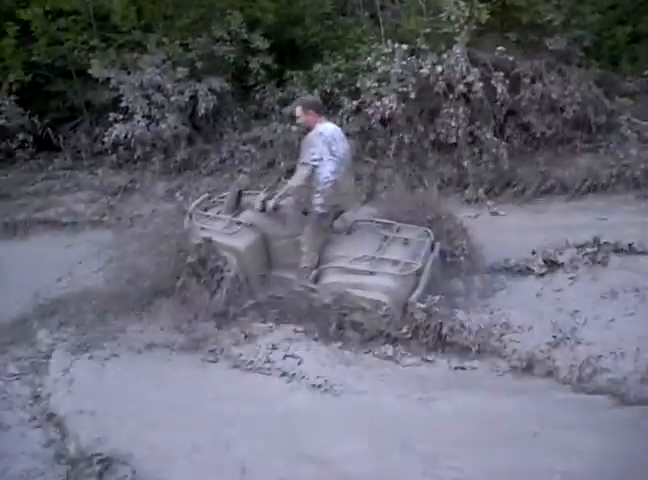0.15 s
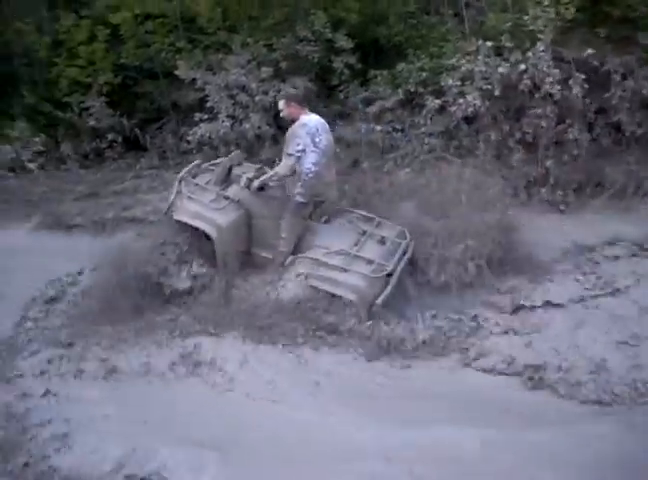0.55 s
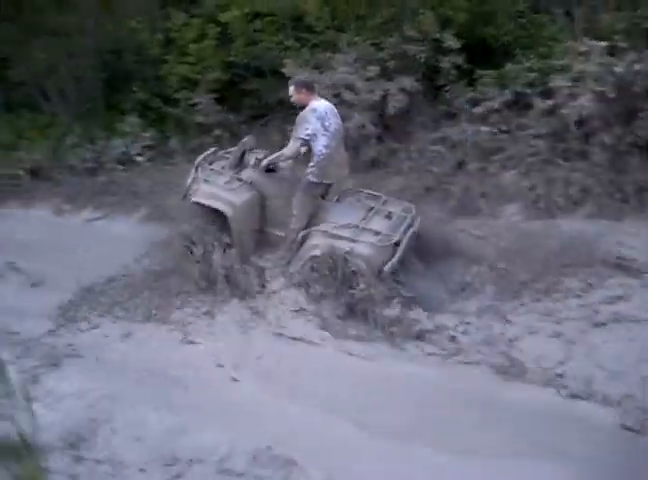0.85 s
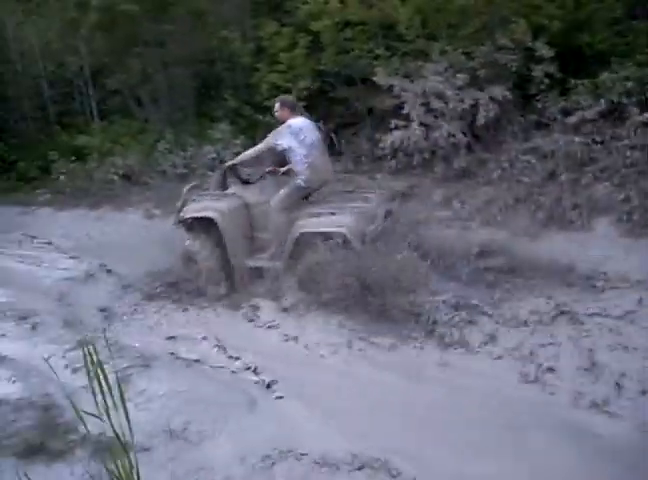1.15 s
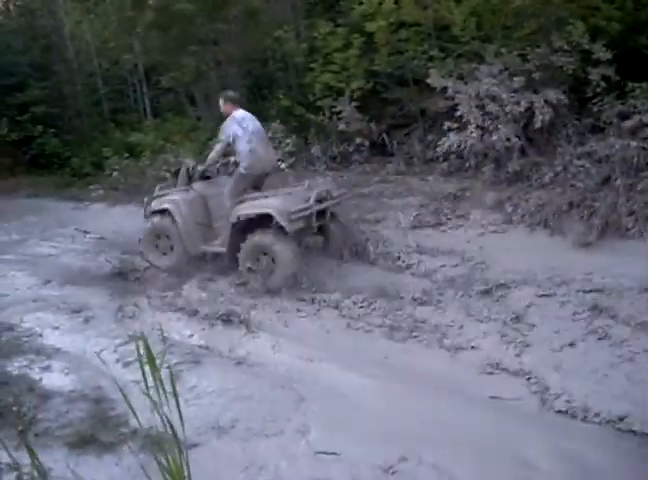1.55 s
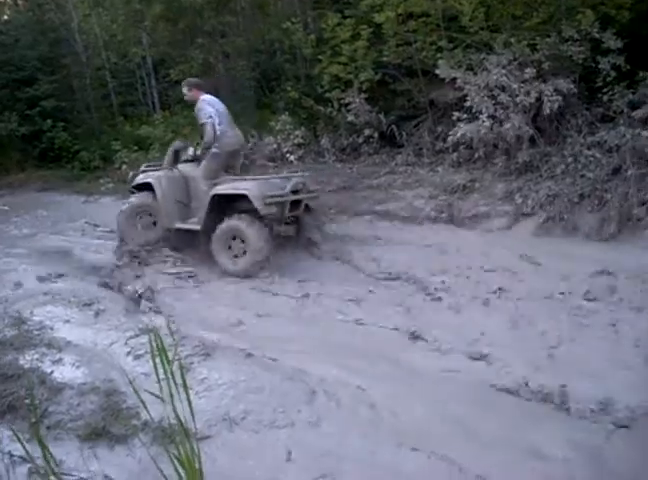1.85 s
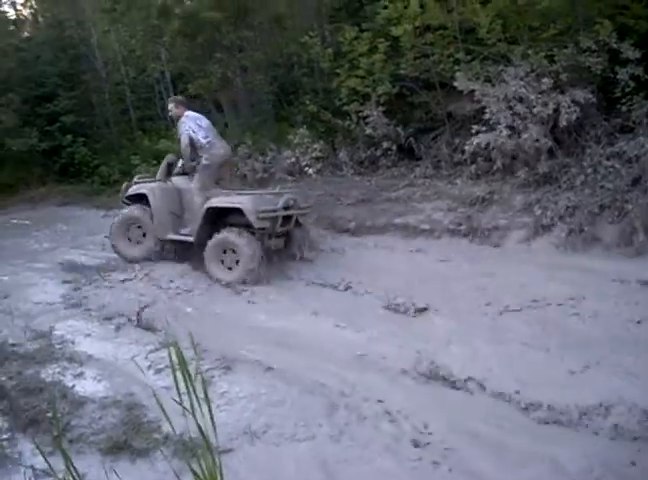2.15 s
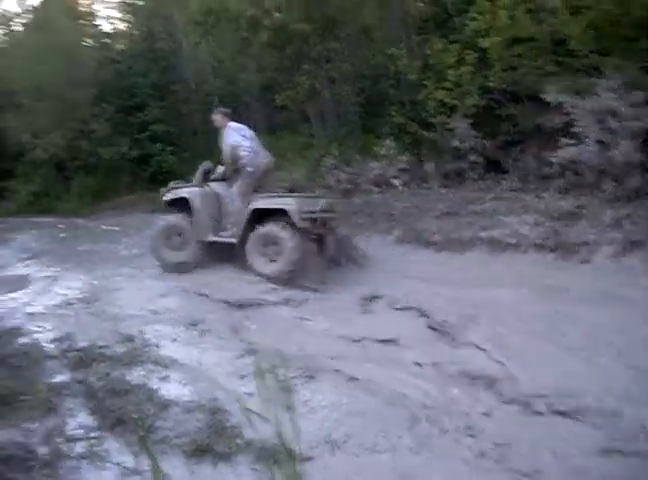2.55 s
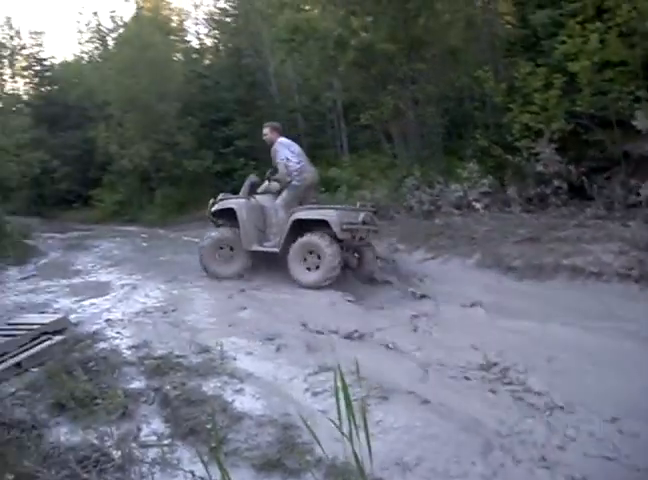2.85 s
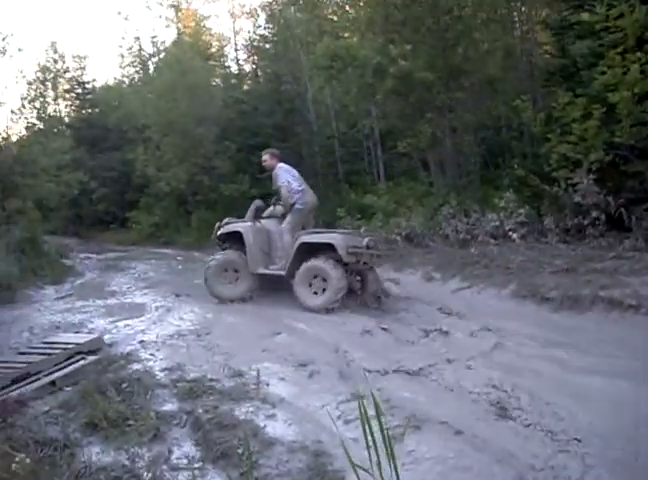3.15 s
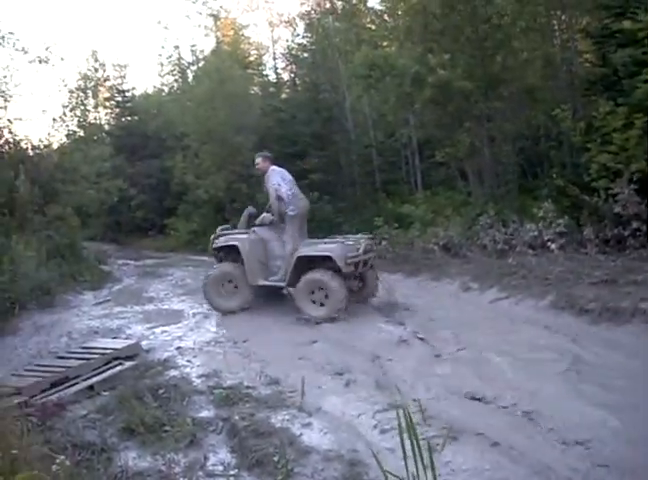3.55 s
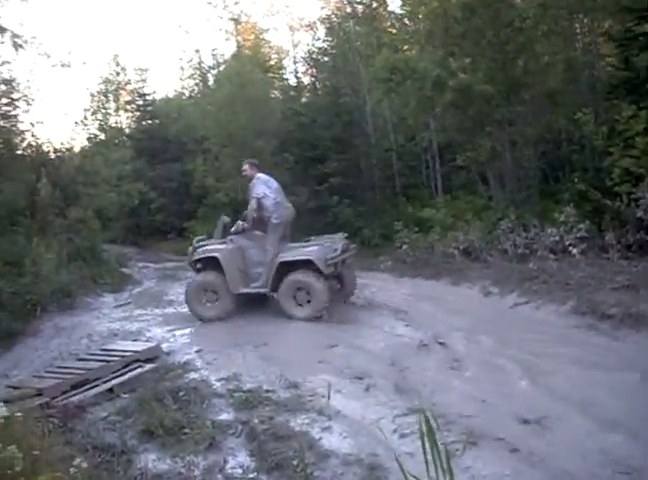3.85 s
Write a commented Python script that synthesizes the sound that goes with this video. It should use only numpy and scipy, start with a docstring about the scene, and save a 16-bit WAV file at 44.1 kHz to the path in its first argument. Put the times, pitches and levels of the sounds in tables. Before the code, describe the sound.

For the first 0.9 seconds a quad bike engine roars at full throttle, its drowned exhaust blasting loud, gritty, buzzing spray over gurgling, churning mud, dipping slightly near 0.5. The spray cuts off and the engine falls by 1.3 to a low, quiet chug amid settling water. From 2 it revs gently, peaking near 2.3, eases by 2.9, then revs again around 3.3-3.7, with small gritty tyre slaps. Dry outdoor sound, dull at the very top.

```python
"""A single-cylinder engine guns a quad bike out of a mud hole, its tail under water.
Its note is a stack of engine orders, coloured by a drowned pipe, an open pipe and a booming silencer.
Each firing blasts a burst of noisy, ringing spray; gurgle and muddy churn are coloured noise, with drops.
The throttle shuts and the water settles; the engine chugs up the bank in two gentle revs
while the tyre lugs slap the wet mud in short bursts of gritty noise."""
import sys
import numpy as np
from scipy import signal
from scipy.fft import rfft, irfft
from scipy.io import wavfile

SR = 44100
rng = np.random.default_rng(int(sys.argv[2]) if len(sys.argv) > 2 else 0)


def store_pcm(level_fs):
    """Save levels as 16-bit WAV."""
    pcm = np.round(np.clip(level_fs, -1, 1) * 32767).astype(np.int16)
    wavfile.write(sys.argv[1], SR, np.atleast_2d(pcm).T)


N = 176400
TIME = np.arange(N) / SR   # s

# engine speed: (time [s], firing rate [Hz])
FIRING_RATE = [(0, 49.8), (.15, 48.37), (.42, 45.4), (.6, 46.96), (.84, 49.2), (1.0, 39), (1.15, 29),
               (1.35, 23), (1.88, 21), (2.0, 23.3), (2.24, 31.6), (2.35, 32.1), (2.58, 30.5), (2.85, 22.3),
               (3.1, 22.8), (3.24, 24), (3.42, 27.4), (3.7, 30.6), (4.0, 25.5)]
# exhaust note with the pipe under water: (time [s], level [dB])
DROWNED_LEVEL = [(0, -30.5), (.22, -35.5), (.37, -29.5), (.5, -31.5), (.55, -35.5), (.8, -35.5), (.95, -36),
                 (1.02, -50), (1.2, -64)]
# exhaust note in open air, swelling with the throttle: (time [s], level [dB])
OPEN_LEVEL = [(.5, -51), (.56, -37), (.8, -40.5), (.9, -51), (1.25, -50.5), (1.82, -54), (1.98, -40),
              (2.25, -34.5), (2.55, -39.5), (2.75, -44.5), (2.95, -49.5), (3.17, -43.5), (3.32, -36.5),
              (3.45, -38.5), (3.7, -38), (3.85, -48.5)]
# low boom of the silencer: (time [s], level [dB])
BOOM_LEVEL = [(.85, -61), (1.08, -38), (1.3, -47), (1.7, -51.5), (2.05, -47), (2.3, -44.5), (2.7, -45.5),
              (2.95, -49.5), (3.3, -45), (4, -48)]
# colour of the drowned pipe: (frequency [Hz], relative level [dB])
DROWNED_COLOUR = [(46, -36), (95, -7), (142, -6), (185, -1.5), (232, -14.5), (274, -0.5), (325, -16.5),
                  (480, -18.5), (680, -10.5), (1400, -28)]
# colour of the open pipe, with a reedy bark above the note: (frequency [Hz], relative level [dB])
OPEN_COLOUR = [(135, -24), (195, -7.5), (222, 0.5), (240, 0.5), (262, -3.5), (292, -11.5), (345, -24),
               (650, -31), (850, -17), (965, -10.5), (1200, -27)]
# colour of the silencer boom: (frequency [Hz], relative level [dB])
BOOM_COLOUR = [(30, -24), (65, -16), (92, -4.5), (112, 2), (126, -2), (155, -14), (200, -13)]
# colour of the gas rushing out with every firing: (frequency [Hz], relative level [dB])
RASP_COLOUR = [(300, -24), (600, -20), (800, 0), (950, 13), (1300, -10), (2500, -3), (11000, -13)]
# spray blown up by the exhaust: (time [s], level [dB])
SPRAY_LEVEL = [(0, -22.5), (.16, -19.5), (.26, -23.5), (.38, -23.5), (.49, -27.5), (.56, -20), (.7, -18),
               (.84, -18), (.865, -21.5), (.9, -34), (1.0, -78)]
# colour of the spray: (frequency [Hz], relative level [dB])
SPRAY_COLOUR = [(150, -33), (500, -11), (1200, -8.5), (1600, 0.5), (2100, -1), (2700, 0), (5500, -0.5),
                (8000, -3), (10300, -6.5), (12000, -17.5)]
# resonances that ring in the spray: (frequency [Hz], width [Hz], relative level [dB])
JET_MODES = [(2620, 290, 2.5), (3500, 100, 7), (3460, 81, 8.5), (4370, 220, -1), (4930, 170, -1.5),
             (5900, 170, -0.5), (6880, 280, -4.5)]
# water gurgling round the pipe: (time [s], level [dB])
GURGLE_LEVEL = [(0, -33.5), (.27, -28.5), (.5, -30), (.82, -29), (.9, -36.5), (1.45, -40), (2.2, -52)]
# colour of the gurgle: (frequency [Hz], relative level [dB])
GURGLE_COLOUR = [(25, -24), (90, -10.5), (250, -6.5), (450, -13.5), (560, -5.5), (680, 2.5), (800, -4.5),
                 (980, -5), (1250, -15), (3000, -21)]
# mud and water thrown by the wheels: (time [s], level [dB])
CHURN_LEVEL = [(0, -30.5), (.9, -29.5), (1.3, -30.5), (1.55, -32), (1.8, -35), (2.2, -32.5), (2.6, -35),
               (3.0, -38.5), (3.5, -37.5), (3.85, -40.5), (4, -40.5)]
# colour of the churned water: (frequency [Hz], relative level [dB])
CHURN_COLOUR = [(25, -31), (70, -2.5), (420, -5.5), (600, -5), (800, 1.5), (1150, 0), (2700, -3),
                (5000, -8), (10200, -15), (12000, -48)]
# slaps of the tyre lugs on the mud: (time [s], relative level [dB])
SLAPS = [(1.9627, -18.5), (1.9984, -19), (2.0388, -25), (2.0934, -20), (2.1294, -17), (2.165, -16.5),
         (2.207, -24), (2.2694, -17.5), (2.3555, -23), (2.6863, -32), (2.7911, -35), (2.8454, -28),
         (2.9542, -30), (3.0074, -28), (3.1073, -25.5), (3.1941, -27), (3.2705, -26), (3.3084, -27),
         (3.3483, -26), (3.423, -23.5), (3.4585, -27), (3.5284, -24), (3.6301, -22.5), (3.731, -25.5),
         (3.8337, -34), (3.953, -24)]
# colour of a slap: (frequency [Hz], relative level [dB])
SLAP_COLOUR = [(200, -5), (700, -24.5), (1500, -4.5), (2700, 4.5), (5000, -0.5), (10200, -4), (12000, -33)]

# cycle position at the start, and where the exhaust valve opens (cycles)
START_TURN, FIRE_TURN = 0.84, 0.35
# unevenness of each engine order (share), and its rate
ORDER_WAVER, BOOM_WAVER, WAVER_HZ = 0.3, 0.47, 16
# how each firing is smeared over its cycle: near 0 it thumps, near 1/3 it purrs
DROWNED_SMEAR, OPEN_SMEAR, BOOM_SMEAR = 0.3, 0.38, 0.0305
# the open pipe's resonances rise a little with speed, up to a top firing rate: top firing rate, exponent
LIFT_TOP_HZ, PIPE_RISE = 31.6, 0.27
RASP_DB, RASP_DECAY_TURNS = -7, 0.33
# spray burst: rise, fall and open part (cycles)
BURST_ATTACK, BURST_RELEASE, BURST_SHARE = 0.074, 0.19, 0.81
# spray: level in the gaps, spread of the grit, level of the ringing
BURST_GAP_DB, SPRAY_GRAIN_DB, JET_RING_DB = -3.5, 2, -7.5
# churn: flicker of the wash, then the drops' density, ring length, spread of sizes and level
CHURN_FLICKER_DB = 1.0
DROPS_PER_S, DROP_CYCLES, DROP_SPREAD_DB, DROPS_DB = 1500, 4.7, 3, -5.5
# how a splat rises, holds, dies and crackles, and the level of all slaps
SLAP_ATTACK_S, SLAP_HOLD_S, SLAP_DECAY_S, SLAP_GRAIN_DB = 0.00074, 0.0096, 0.0045, 3
SLAP_DB = -14
CUTOFF_HZ = 12400


def from_db(db):
    """Decibels to gain."""
    return 10 ** (np.asarray(db) / 20)


def rms_one(x):
    """Scale to rms 1."""
    return x / np.sqrt(np.mean(x ** 2) + 1e-20)


def curve(rows):
    """Join (time, value) rows by straight lines."""
    return np.interp(TIME, *np.transpose(rows))


def gain_at(spectrum, hz):
    """Gain of a colour at some frequencies, joined on a log frequency axis."""
    points, db = np.transpose(spectrum)
    return from_db(np.interp(np.log(hz + 1), np.log(points), db))


def noise(spectrum):
    """Coloured noise of rms 1."""
    white = rfft(rng.standard_normal(N))
    return rms_one(irfft(white * gain_at(spectrum, np.fft.rfftfreq(N, 1 / SR)), N))


def drift(rate):
    """Smooth random wander of spread 1; rate in Hz."""
    r = np.exp(-2 * np.pi * rate / SR)
    wander = signal.lfilter([1], [1, -2 * r, r * r], rng.standard_normal(N + SR))
    return rms_one(wander[SR:])   # the first second lets the filter settle


def resonance(x, hz, width):
    """One resonance with gain 1 on top."""
    r = np.exp(-np.pi * width / SR)
    zeros = np.array([1, 0, -1]) * (1 - r * r) / 2
    poles = [1, -2 * r * np.cos(2 * np.pi * hz / SR), r * r]
    return signal.lfilter(zeros, poles, x + 1e-18)


def body(x, modes):
    """Resonances in parallel with alternating signs; rms 1."""
    ringing = 0
    for k, (hz, width, db) in enumerate(modes):
        ringing = ringing + (-1) ** k * from_db(db) * resonance(x, hz, width)
    return rms_one(ringing)


def engine_orders(turns, speed, spectrum, waver, smear, count):
    """Multiples of the firing rate glide through the pipe's colour, each wavering a little; rms about 1."""
    coarse = TIME[::100]
    knots = np.arange(0, TIME[-1] + 1, 1 / WAVER_HZ)
    out, power = 0, 0
    for k in range(1, count + 1):
        gain = gain_at(spectrum, k * speed[::100])
        wobble = 1 + waver * np.interp(coarse, knots, rng.standard_normal(len(knots)))
        # phase growing with the square of the order spreads the pulse over its cycle
        order = np.sin(2 * np.pi * (k * turns - smear * k * k))
        out = out + np.interp(TIME, coarse, gain * wobble) * order
        power = power + gain ** 2 / 2
    return out / np.interp(TIME, coarse, np.sqrt(power))


def drowned_exhaust(turns, speed):
    """The engine orders, coloured by the pipe under water."""
    note = engine_orders(turns, speed, DROWNED_COLOUR, ORDER_WAVER, DROWNED_SMEAR, count=28)
    return from_db(curve(DROWNED_LEVEL)) * note


def spray(turns):
    """The drowned pipe blows a gritty, ringing burst of spray in every cycle."""
    turn = turns % 1
    rise = turn / BURST_ATTACK
    fall = (BURST_SHARE - turn) / BURST_RELEASE
    blowing = np.clip(np.minimum(rise, fall), 0, 1)
    burst_db = BURST_GAP_DB * (1 - blowing) + SPRAY_GRAIN_DB * drift(220)
    bursts = rms_one(noise(SPRAY_COLOUR) * from_db(burst_db))
    ringing = body(rng.standard_normal(N) * blowing, JET_MODES)
    return from_db(curve(SPRAY_LEVEL)) * rms_one(bursts + from_db(JET_RING_DB) * ringing)


def gurgle():
    """Water gurgles round the pipe as coloured noise."""
    return from_db(curve(GURGLE_LEVEL)) * noise(GURGLE_COLOUR)


def churn():
    """A wash of muddy water with many short drops and bubbles, each a struck resonance."""
    sizes = from_db(DROP_SPREAD_DB * np.minimum(rng.exponential(1, N), 5))
    strikes = sizes * rng.choice([-1, 1], N) * (rng.random(N) < DROPS_PER_S / SR)
    pitches = np.geomspace(600, 9000, 20)   # Hz
    dealt = rng.integers(0, len(pitches), N)   # which pitch a drop gets
    drops = 0
    for k, hz in enumerate(pitches):
        ring = resonance(strikes * (dealt == k), hz, 2 * hz / DROP_CYCLES)
        drops = drops + gain_at(CHURN_COLOUR, hz) * ring
    wash = noise(CHURN_COLOUR) * from_db(CHURN_FLICKER_DB * drift(38))
    return from_db(curve(CHURN_LEVEL)) * rms_one(wash + from_db(DROPS_DB) * rms_one(drops))


def open_exhaust(turns, speed):
    """The engine orders through the open pipe, with gas rasping out at every firing."""
    lift = (np.minimum(speed, LIFT_TOP_HZ) / LIFT_TOP_HZ) ** PIPE_RISE
    # reading the colour at speed / lift moves its resonances by lift
    note = engine_orders(turns, speed / lift, OPEN_COLOUR, ORDER_WAVER, OPEN_SMEAR, count=44)
    since_firing = (turns - FIRE_TURN) % 1
    rasp = rms_one(noise(RASP_COLOUR) * np.exp(-since_firing / RASP_DECAY_TURNS))
    return from_db(curve(OPEN_LEVEL)) * (note + from_db(RASP_DB) * rasp)


def silencer_boom(turns, speed):
    """The lowest orders, little smeared, thump in the silencer at every firing."""
    thumps = engine_orders(turns - FIRE_TURN, speed, BOOM_COLOUR, BOOM_WAVER, BOOM_SMEAR, count=9)
    return from_db(curve(BOOM_LEVEL)) * thumps


def slaps():
    """Each lug squeezes out a short, gritty splat of noise."""
    envelope = np.zeros(N)
    for start, db in SLAPS:
        age = TIME - start
        rise = np.clip(age / SLAP_ATTACK_S + 1, 0, 1)
        decay = np.exp(-np.clip((age - SLAP_HOLD_S) / SLAP_DECAY_S, 0, 20))
        envelope += from_db(db + SLAP_DB) * rise * decay
    return envelope * rms_one(noise(SLAP_COLOUR) * from_db(SLAP_GRAIN_DB * drift(190)))


def scene():
    """Engine, spray and mud, heard from the bank."""
    speed = curve(FIRING_RATE)
    turns = START_TURN + np.cumsum(speed) / SR   # engine cycles so far
    water = spray(turns) + gurgle() + churn()
    engine = drowned_exhaust(turns, speed) + open_exhaust(turns, speed) + silencer_boom(turns, speed)
    return (engine + water + slaps())[None]


def record(dry):
    """A steep low-pass cuts the top, 70 dB down from the cutoff."""
    return signal.sosfilt(signal.cheby2(16, 70, CUTOFF_HZ, fs=SR, output="sos"), dry)


dry = scene()
out = record(dry)
store_pcm(out)
```